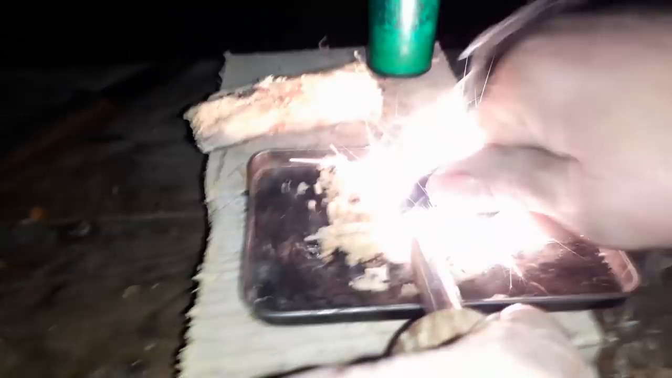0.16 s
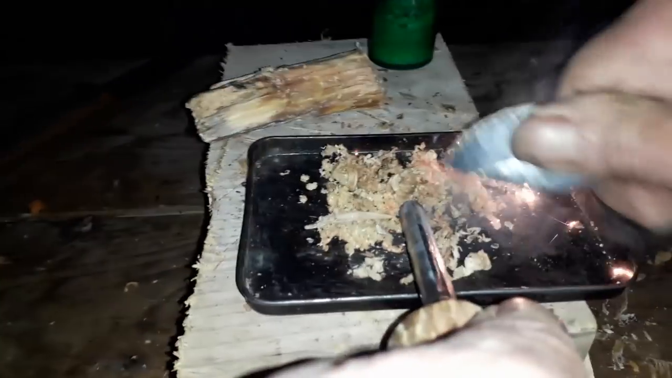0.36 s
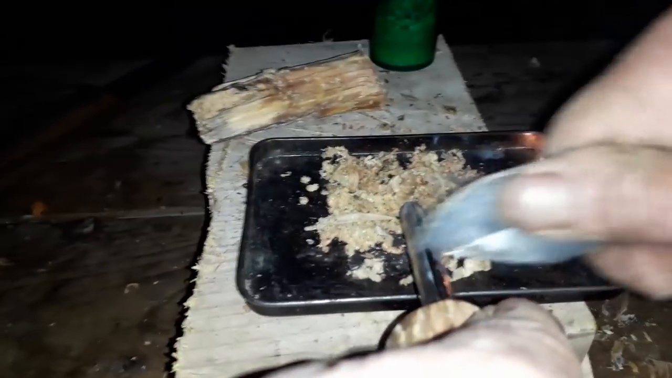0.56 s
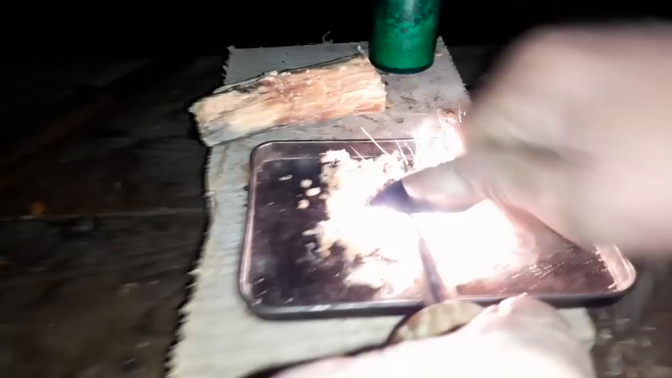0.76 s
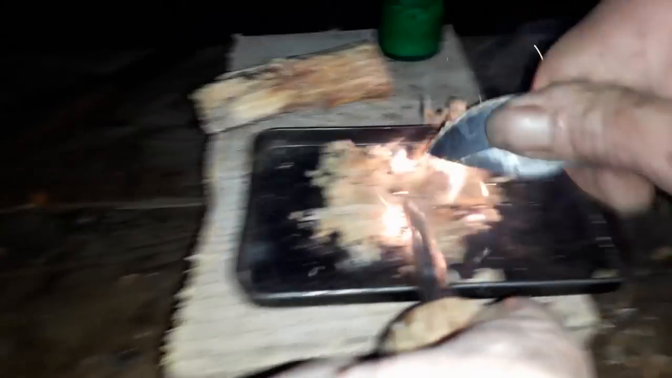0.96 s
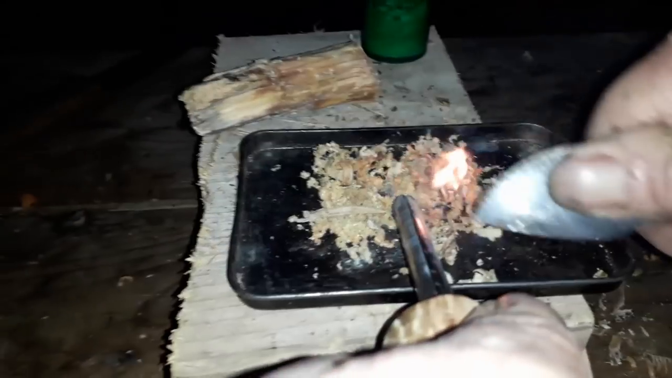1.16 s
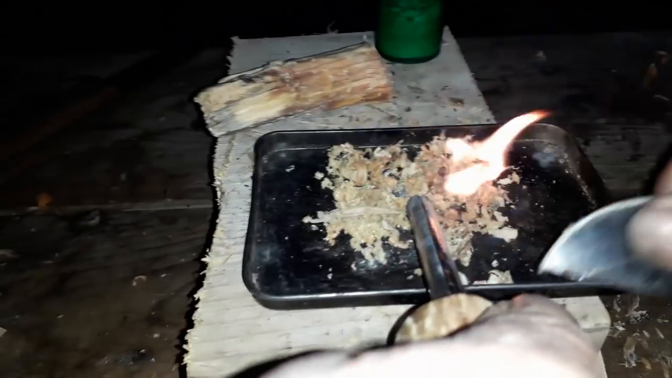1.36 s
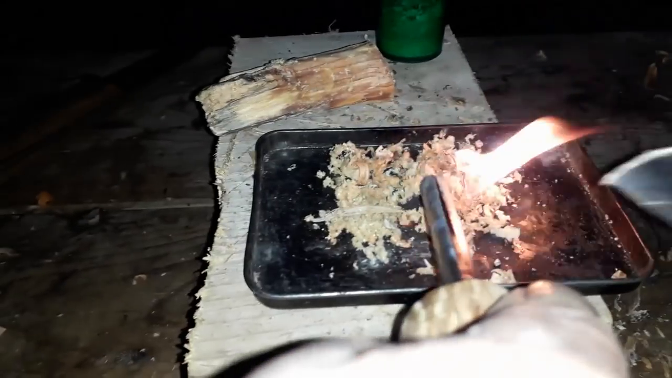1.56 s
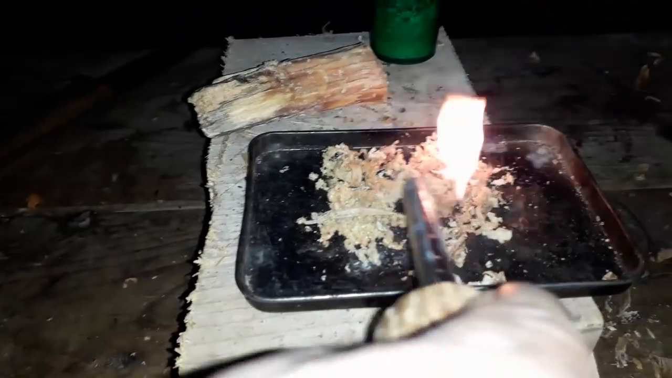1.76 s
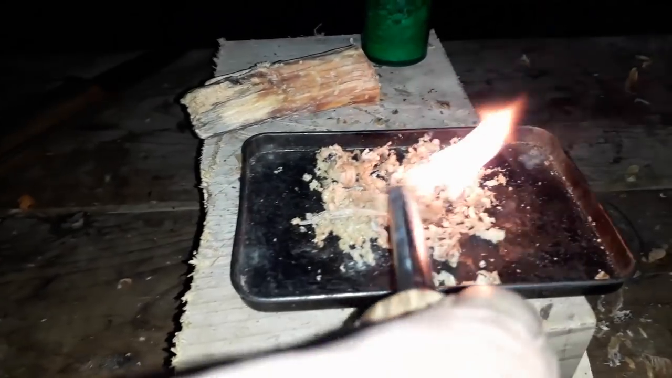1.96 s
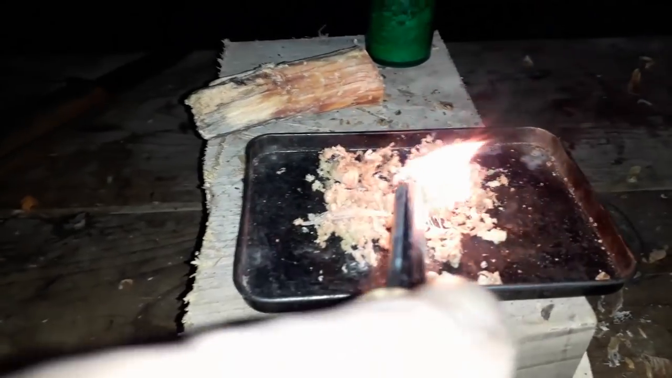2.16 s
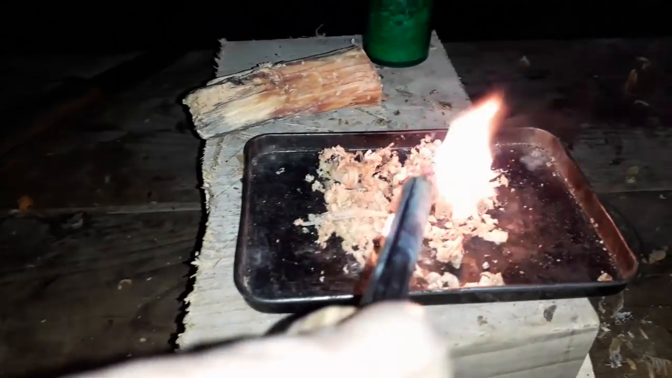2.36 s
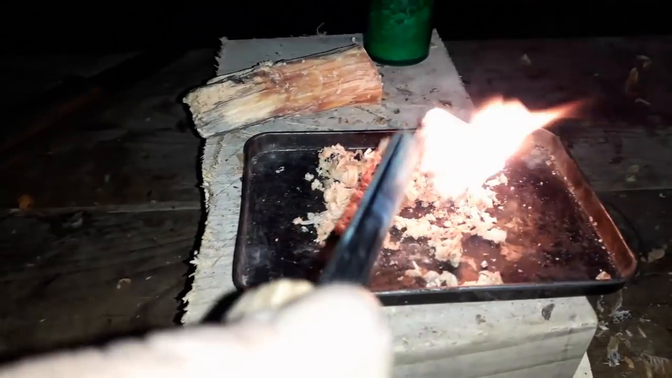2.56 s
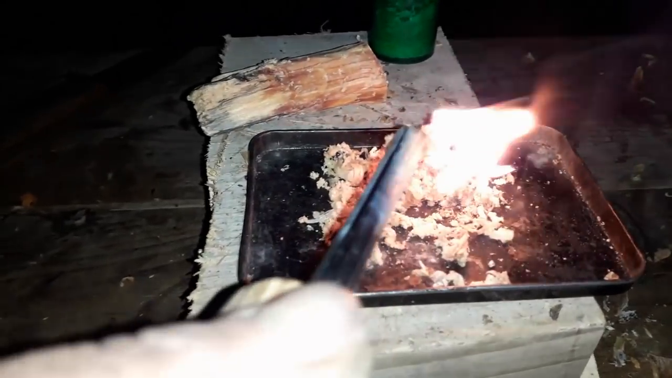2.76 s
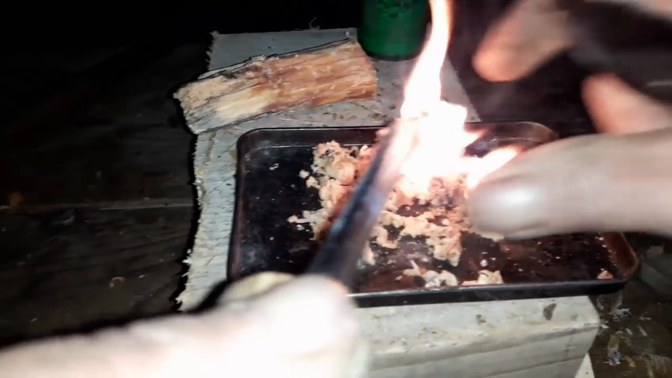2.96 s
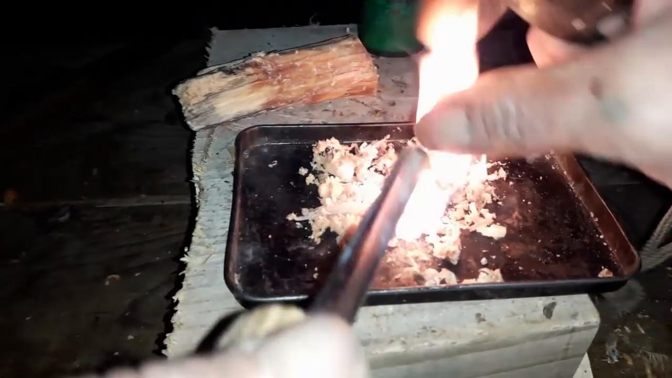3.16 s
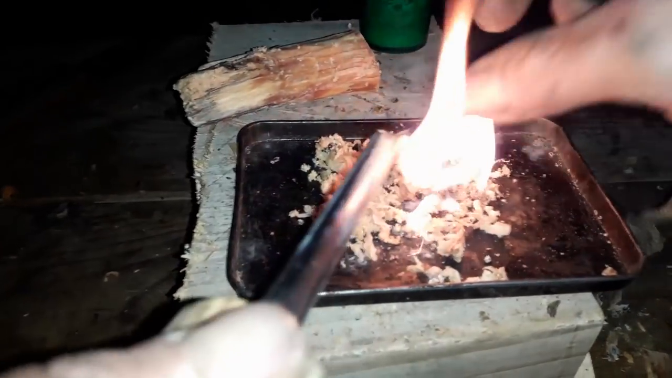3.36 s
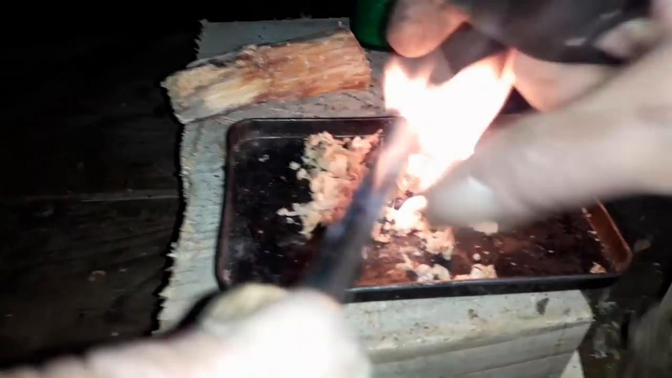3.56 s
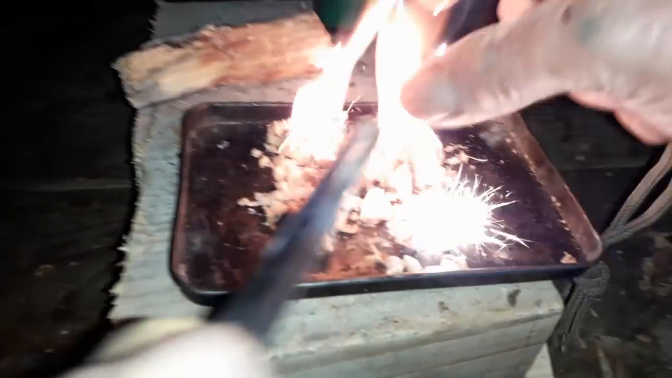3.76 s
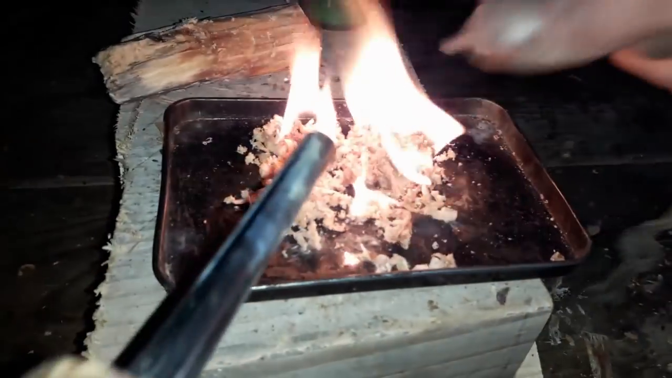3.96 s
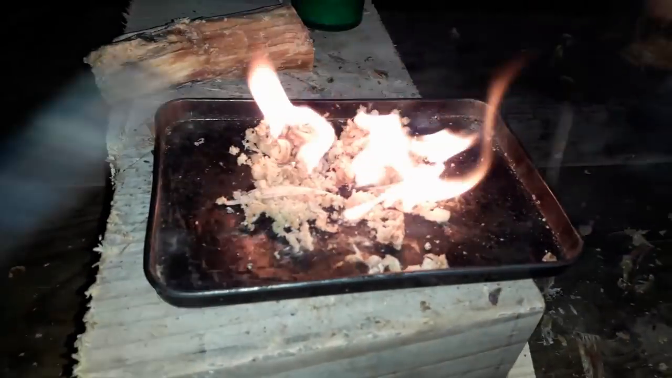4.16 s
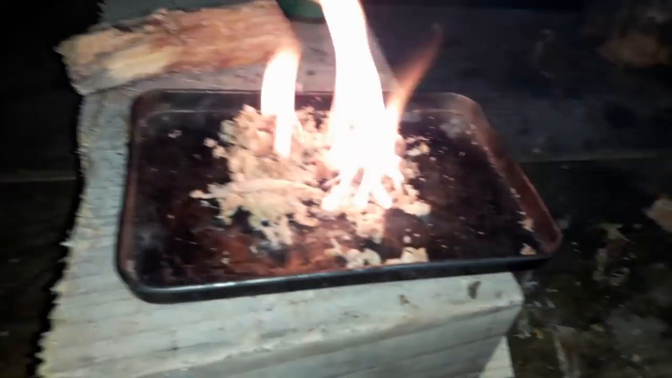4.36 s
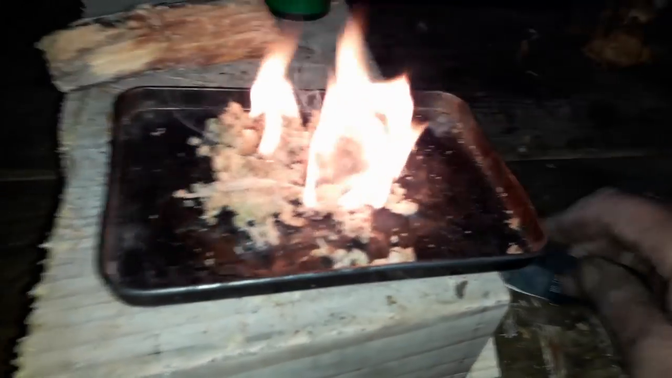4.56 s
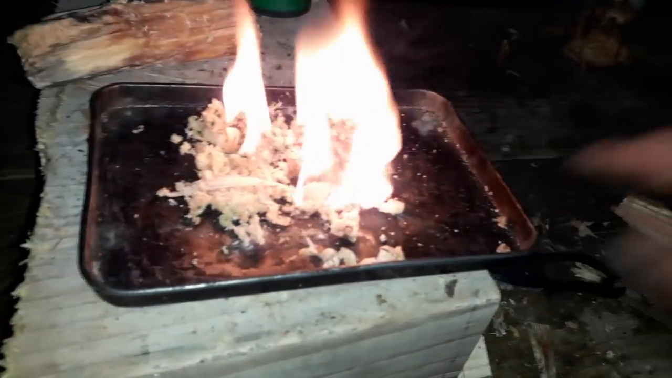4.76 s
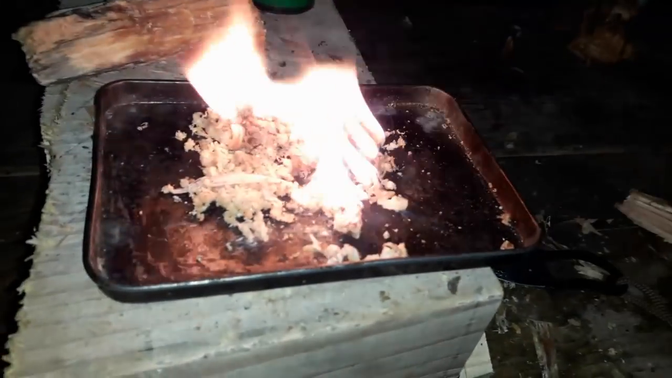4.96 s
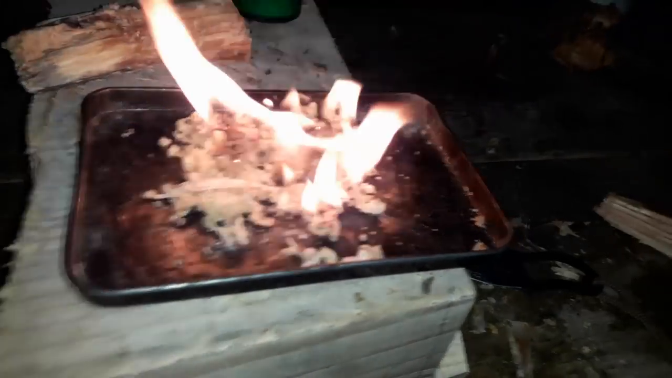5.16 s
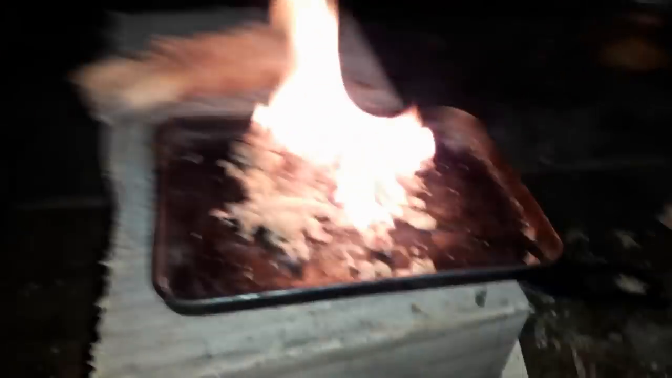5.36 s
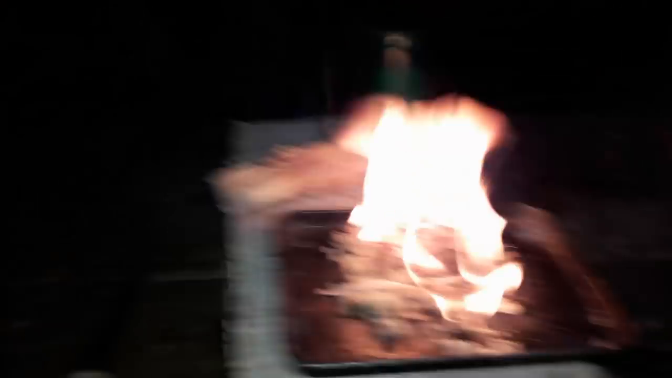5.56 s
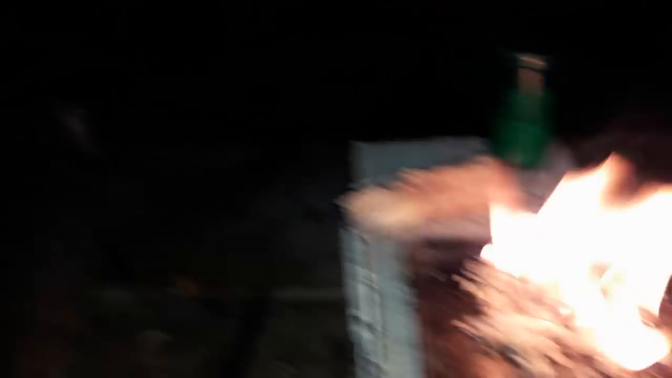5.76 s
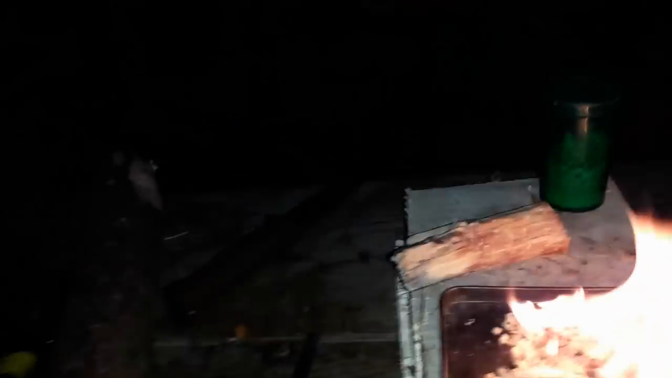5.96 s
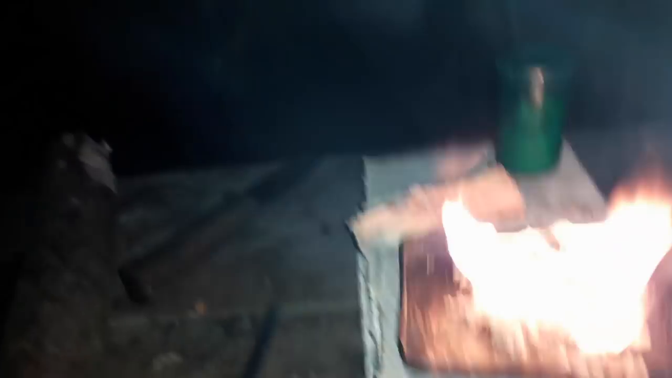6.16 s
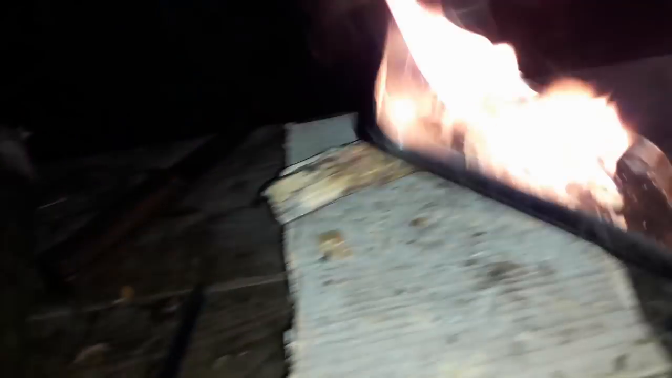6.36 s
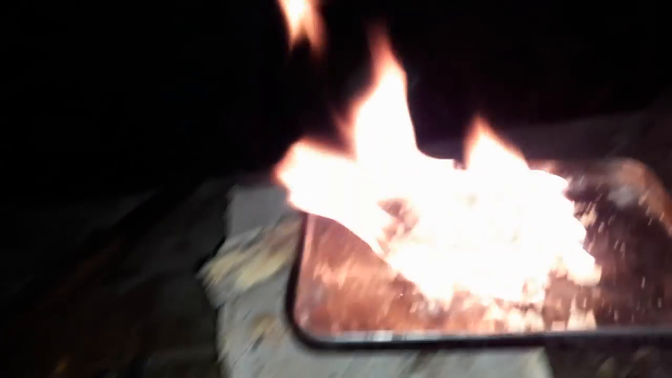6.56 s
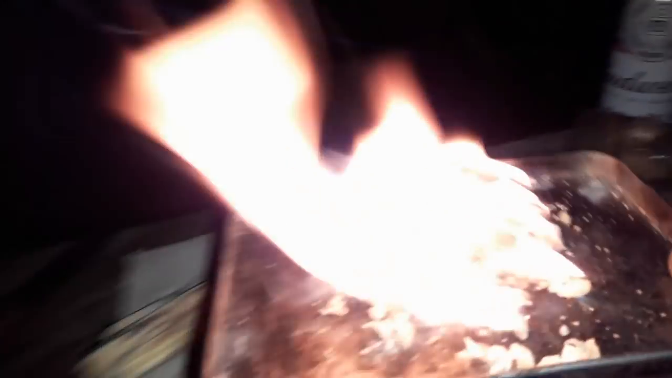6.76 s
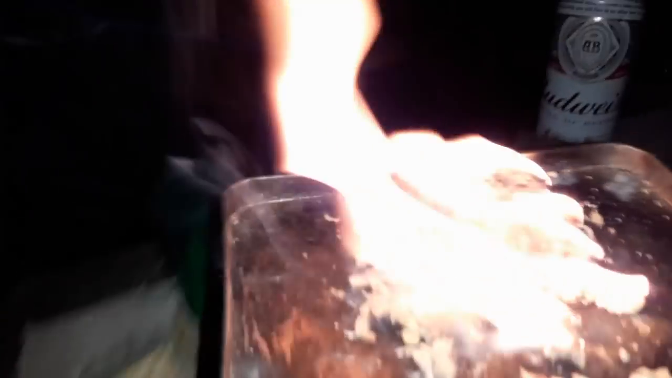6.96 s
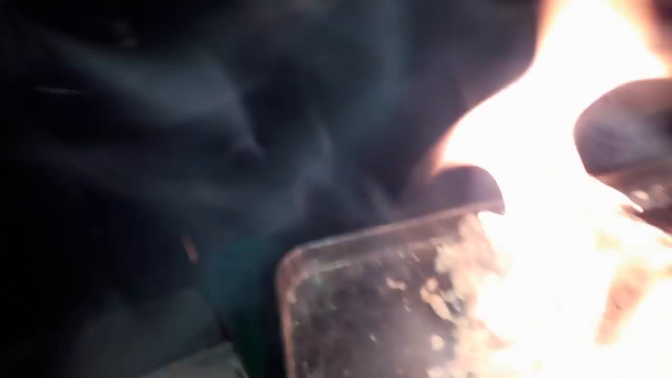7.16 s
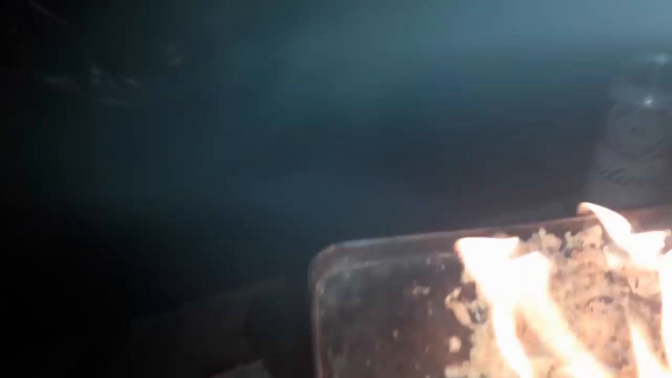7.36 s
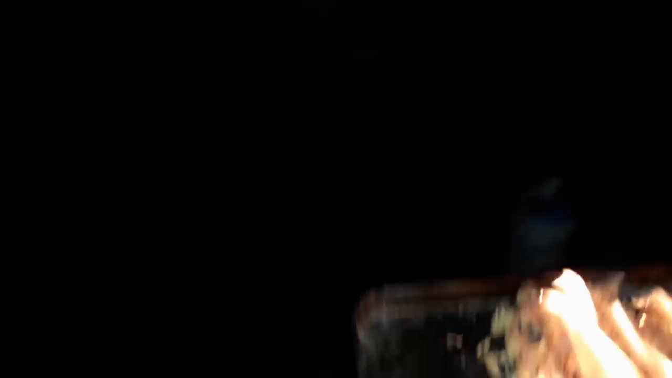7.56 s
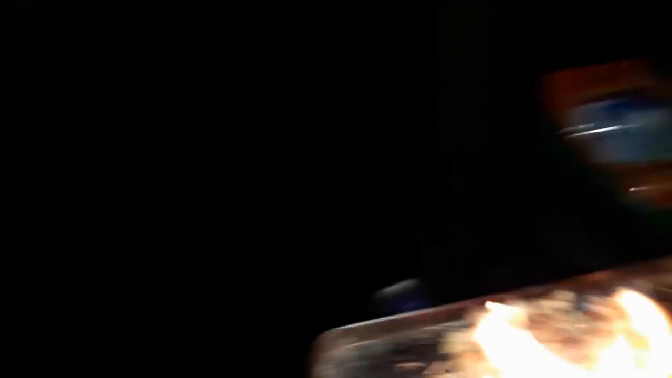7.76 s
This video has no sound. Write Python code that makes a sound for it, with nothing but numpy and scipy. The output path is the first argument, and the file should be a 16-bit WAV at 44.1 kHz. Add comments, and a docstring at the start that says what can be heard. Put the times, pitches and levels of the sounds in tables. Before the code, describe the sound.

A close microphone at night picks up soft low rumble, distant airy wash and faint high hiss. At 0.07-0.25 s a knife spine rasps hard along a metal rod, gritty and ringing, with a dull knock and low puff. A piercing slap at 0.65 leads into a second ringing scrape, sharpest around 0.83, with light trailing scratches until 1.0. Near quiet follows, with tiny sizzles; a snap comes at 2.3, then a crisp snap and faint falling whistle at 3.1. Bright clicks and a dry, non-ringing flick cluster at 3.4-4.0, followed by soft flame puffs. At 4.77 the knife handle clunks onto boards, its blade briefly ringing before damping. From 5.2 to 7.1 fine pops, sizzles and rustles play over stronger hiss. Loud snaps strike at 7.3 and 7.5, with a very faint high whistle, a low puff and a last knock at 7.77.

```python
"""Sparks from a ferro rod at night

A knife spine scrapes a rod, twice with a ringing rod and later once as a bright flick without ring.
Strokes are trains of random fractures shaped by pressure; blows are decaying bursts through a resonance.
Shavings sizzle, and they, rustles and puffs are swells of coloured grains; the put-down knife is damped modes.
Thin whistles are gliding tones; the night and a high hiss, rising and falling and louder later on, are
filtered noise, and reflections follow close sounds."""
import sys
import numpy as np
from scipy import signal
from scipy.fft import rfft
from scipy.io import wavfile
from scipy.ndimage import uniform_filter1d

SR = 44100
rng = np.random.default_rng(int(sys.argv[2]) if len(sys.argv) > 2 else 0)


def unload_wav(signal):
    """Save mono or channel-first audio to the path in sys.argv[1] as 16-bit WAV at rate SR, clipped to [-1, 1]."""
    wavfile.write(
        sys.argv[1],
        SR,
        np.round(np.clip(np.atleast_2d(signal).T, -1, 1) * 32767).astype(np.int16),
    )


N = 344851
T = np.arange(N) / SR
HZ = np.fft.rfftfreq(2048, 1 / SR)


def amp(db):
    """Decibel law: an amplitude ratio is ten to the power dB / 20."""
    return 10 ** (np.asarray(db) / 20)


def evened(x):
    """Power normalisation: scales a signal to rms 1."""
    return x / np.sqrt(np.mean(x ** 2) + 1e-20)


def read(points, hz=HZ):
    """Spectral interpolation: reads levels in dB along a logarithmic frequency axis."""
    f, db = np.transpose(points)
    return np.interp(np.log(hz + 1), np.log(f + 1), db)


def add(mix, s, sound):
    """Superposition: adds a sound to the mix from time s onward."""
    part = mix[max(round(s * SR), 0):][:len(sound)]
    part += sound[:len(part)]


def colour(x, db):
    """Minimum-phase filtering: the Hilbert transform of the log gain at HZ supplies a causal phase."""
    log_gain = np.log(amp(np.maximum(db, db.max() - 90)))
    circle = np.concatenate([log_gain, log_gain[-2:0:-1]])
    response = np.exp(np.conj(signal.hilbert(circle)))
    taps = np.fft.ifft(response).real
    return signal.oaconvolve(x, taps)[:len(x)]


def band_rms(x, lo_hz, hi_hz):
    """Parseval's theorem: the rms of one band follows from its spectral lines."""
    hz = np.fft.rfftfreq(len(x), 1 / SR)
    lines = np.fft.rfft(x)[(hz > lo_hz) & (hz < hi_hz)]
    return np.sqrt(2 * np.sum(abs(lines) ** 2)) / len(x)


def grains(size, per_s, spread_db):
    """Shot noise: sparse impulses of random sign, a few much larger than the rest."""
    sizes_db = spread_db * np.minimum(rng.exponential(1, size), 4)
    impulses = amp(sizes_db) * rng.choice([-1, 1], size)
    return impulses * (rng.random(size) < per_s / SR)


def drift(size, span):
    """Low-pass fluctuation: noise averaged twice over span seconds, at rms 1."""
    width = max(int(span * SR), 2)
    smooth = uniform_filter1d(rng.standard_normal(size), width)
    return evened(uniform_filter1d(smooth, width))


RISE_SHARE = .36  # part of each length spent swelling


def swell(length):
    """Transient envelope: a skewed bell peaking at 1, returned after the time to its peak."""
    rise, fall = length * RISE_SHARE, length * (1 - RISE_SHARE)
    t = np.arange(-3 * rise, 3 * fall, 1 / SR)
    away = abs(t / np.where(t < 0, rise, fall))
    return 3 * rise, np.exp(-2 * away ** 1.5)


def swells(rows, spectrum, per_s, spread_db):
    """Granular excitation: short spells of random impulses share one spectrum."""
    out = np.zeros(N)
    for s, db, length in rows:
        lead, shape = swell(length)
        sound = shape * colour(grains(len(shape), per_s, spread_db), read(spectrum))
        sound *= amp(db) * np.linalg.norm(shape) / np.linalg.norm(sound)
        before_start = max(round((lead - s) * SR), 0)  # samples that would precede t = 0
        add(out, s - lead, sound[before_start:])
    return out


def blows(rows, skirt_db, contact):
    """Impact excitation: one hard contact and a fast-dying rattle drive a broad resonance."""
    out, t = np.zeros(N), np.arange(SR // 6) / SR
    for s, db, decay, hz, octaves in rows:
        push = rng.choice([-1, 1], len(t)) * np.exp(-t / decay)
        push[0] = contact * np.linalg.norm(push)
        away = np.log2((HZ + 20) / hz) / octaves
        burst = colour(push, -skirt_db * np.log2(1 + away ** 2 / 2))
        add(out, s, amp(db) * burst * np.sqrt(decay * SR / 2) / np.linalg.norm(burst))
    return out


def strikes(hits, body):
    """Modal excitation: every hit sounds all the resonances of the body."""
    return [(s, db + share_db, decay, hz, octaves)
            for s, db in hits for share_db, decay, hz, octaves in body]


def patchy(x, depth_db, order=9):
    """Spectral modulation: narrow bands of a sound come and go independently."""
    z = signal.stft(x, nperseg=512)[2]
    across_bands = uniform_filter1d(rng.standard_normal(z.shape), order // 2, 0)
    patches = evened(uniform_filter1d(across_bands, order, 1))
    return signal.istft(z * amp(depth_db * patches))[1][:len(x)]


def surroundings(x, near_db, near_t60, far_db=-33, far_t60=0.42):
    """Reverberation: quick reflections from tray and boards, then a fainter, longer decay (t60 in s)."""
    t = np.arange(SR // 2) / SR
    near, far = (rng.standard_normal(len(t)) * (t > .0015) * amp(-60 * t / t60)
                 for t60 in (near_t60, far_t60))
    echoes = amp(near_db) * near / np.linalg.norm(near) + amp(far_db) * far / np.linalg.norm(far)
    return x + signal.oaconvolve(x, echoes)[:N]


# spectrum of the night: f/Hz, level/dB
NIGHT = [(15, -52), (25, -28), (60, -4.5), (86, 0), (140, -3.5), (242, -5), (420, -14), (482, -10),
         (528, -13), (592, -10), (1150, -3.5), (1230, -4), (2880, -22.5), (4450, -36), (6000, -35),
         (7800, -57), (13200, -120)]
# course of the night before trim: t/s, rumble level/dB, wash level/dB
NIGHT_LEVELS = [(0.42, -57, -52.5), (0.75, -55, -49.5), (1.18, -60, -54.5), (1.76, -58.5, -54),
                (2.29, -50.5, -44.5), (3.12, -52, -46.5), (4.29, -48.5, -46.5), (5.28, -51.5, -45),
                (6.85, -50, -45), (7.22, -47, -45.5), (7.82, -50, -46)]
# spectrum of the high hiss: f/Hz, level/dB
HISS = [(1500, -23.5), (3500, -2.5), (5000, -3), (7700, 1), (10000, -3.5), (16000, -8.5)]
# high hiss before trim, rising and falling, louder later on: t/s, level/dB
HISS_LEVELS = [(1.0, -74), (1.44, -78.5), (2.39, -65), (3.68, -67), (3.77, -60.5), (5.23, -63.5),
               (5.44, -55), (5.69, -61.5), (6.37, -57.5), (7.82, -57.5)]


def air(rumble_db=0.55, wash_db=-0.3, hiss_db=-.3, crackle_db=-8, split_hz=400):
    """Filtered noise: low rumble, distant wash, and a high hiss with a little shot noise in it."""
    s, *levels = np.transpose(NIGHT_LEVELS)
    rumble, wash = (amp(np.interp(T, s, level)) for level in levels)
    hiss = amp(np.interp(T, *np.transpose(HISS_LEVELS)))

    low_share = 1 / (1 + ((HZ + 1) / split_hz) ** 4)  # share of power given to the rumble
    low = colour(rng.standard_normal(N), read(NIGHT) + 10 * np.log10(low_share))
    mid = colour(rng.standard_normal(N), read(NIGHT) + 10 * np.log10(1 - low_share + 1e-9))
    fine_crackle = evened(grains(N, per_s=150, spread_db=5.5))
    high = colour(rng.standard_normal(N) + amp(crackle_db) * fine_crackle, read(HISS))

    low = low / band_rms(low, 40, 300)
    mid = mid / band_rms(mid, 600, 2000)
    high = high / band_rms(high, 4000, 8000)
    return amp(rumble_db) * rumble * low + amp(wash_db) * wash * mid + amp(hiss_db) * hiss * high


# things brushed and shifted nearby: peak t/s, level/dB, length t/s
RUSTLES = [(.015, -48, 0.057), (5.915, -38, 0.065), (6.03, -49.5, 0.12), (6.44, -48.5, .12),
           (7.0, -45, .065), (7.15, -49.5, .13)]
# spectrum of a rustle: f/Hz, level/dB
RUSTLE = [(300, -11.5), (1200, -1.5), (3000, 0), (5000, -5.5), (7500, -5.5), (16000, -18)]


def rustles():
    """Friction noise: brushed things give sparse grains whose bands come and go."""
    return patchy(swells(RUSTLES, RUSTLE, per_s=450, spread_db=4.5), depth_db=4)


# low puffs of air and flame: peak t/s, level/dB, length t/s
PUFFS = [(.167, -32.5, .028), (.825, -39, .05), (2.069, -41.5, .05), (4.007, -31.5, 0.037),
         (4.132, -30, .058), (4.511, -41, .025), (4.945, -30.5, .019), (7.653, -33, 0.024)]
# spectrum of a puff: f/Hz, level/dB
PUFF = [(30, -16), (70, 2), (130, 7.5), (210, -2.5), (350, -18.5), (1000, -54), (4000, -87.5)]


def puffs():
    """Turbulence: puffs of air and flame are dense grains of mostly low frequency."""
    return swells(PUFFS, PUFF, per_s=5000, spread_db=2.5)


# sparks and sizzling in the shavings: peak t/s, level/dB, length t/s
SIZZLES = [(.455, -59.5, .03), (1.585, -62.5, .06), (1.82, -57.5, .05), (1.92, -61, .06),
           (2.27, -51.5, .22), (5.255, -47.5, .07), (5.38, -48.5, .15), (5.61, -46, .09),
           (6.25, -42.5, .055), (6.48, -42.5, .12), (6.63, -44, .12)]
# spectrum of the sizzle: f/Hz, level/dB
SIZZLE = [(500, -23), (2000, 2), (4000, 2), (7500, 8.5), (12000, 0), (16000, -5)]


def sizzles():
    """Shot noise: sparks and sizzling shavings are bright grains in short spells."""
    return swells(SIZZLES, SIZZLE, per_s=900, spread_db=4.5)


# gas leaving the hot wood: t/s, length t/s, first f/Hz, last f/Hz, arch f/Hz, level/dB, fade/dB
WHISTLES = [(3.099, .46, 3870, 3150, -100, -57, 12), (7.44, .25, 9100, 8700, 1550, -57, -1)]


def whistles(waver=0.019, flutter_db=5):
    """Jet tones: escaping gas is a sine of unsteady, arching frequency and fluttering level."""
    out = np.zeros(N)
    for s, length, first_hz, last_hz, arch_hz, db, fade_db in WHISTLES:
        u = np.linspace(0, 1, round(length * SR))
        glide = first_hz + (last_hz - first_hz) * u + arch_hz * np.sin(np.pi * u)
        pitch = glide * (1 + waver * drift(len(u), span=0.0011))
        level_db = db - fade_db * u + flutter_db * drift(len(u), span=0.013)
        level = amp(level_db) * signal.windows.tukey(len(u), .1)
        add(out, s, level * np.sin(2 * np.pi * np.cumsum(pitch) / SR))
    return out


# small pops once the pile has caught; level and frequency are the centres of their spread
CRACKLE_FROM_S, CRACKLE_TO_S, CRACKLES_PER_S = 5.2, 7.1, 7.9
CRACKLE_DB, CRACKLE_HZ = -43.5, 4520


def crackles(spread_db=4, spread_octaves=0.42):
    """Random point process: pops jittered about an even grid, each of its own level and frequency."""
    slots = np.arange(CRACKLE_FROM_S, CRACKLE_TO_S, 1 / CRACKLES_PER_S)
    draws = rng.standard_normal((len(slots), 3))
    return [(s + late / CRACKLES_PER_S,
             CRACKLE_DB + spread_db * size,
             CRACKLE_HZ * 2 ** (spread_octaves * pitch))
            for s, (late, size, pitch) in zip(slots, draws)]


# light ticks of sparks and shavings: t/s, level/dB, centre f/Hz
TICKS = [(2.226, -34, 5940), (3.629, -26, 6000), (3.6488, -20, 5500), (3.694, -24.5, 7000),
         (3.7265, -19.5, 6540), (5.254, -34.5, 6000), (5.598, -26.5, 7000), (5.633, -34, 6500),
         (5.862, -32.5, 2400), (5.899, -31, 3500), (5.957, -31.5, 3300), (5.981, -28, 4000),
         (6.367, -32.5, 5000), (6.4485, -28, 3300), (6.478, -27, 7500), (6.69, -34, 3500),
         (6.993, -30, 3000), (7.7738, -30, 2600)]
TICK_S, TICK_OCTAVES = 0.0018, 0.88  # decay and resonance width
# sharp snaps of steel, rod and burning wood: t/s, level/dB, decay t/s, centre f/Hz, width/octaves
SNAPS = [(2.3043, -22, 0.0043, 4000, 2.2), (3.097, -14, 0.00043, 6330, 0.18),
         (3.1706, -22.5, 0.0041, 6500, 1), (3.6363, -16.5, 0.0032, 6000, 1.1),
         (5.913, -31.5, 0.0086, 3800, 0.84), (6.978, -29.5, .005, 2800, 1.4),
         (7.3082, -13.5, 0.0029, 3200, 0.28), (7.3083, -19, 0.0042, 7000, 0.25),
         (7.3163, -15.5, 0.0027, 2270, 1.2), (7.5145, -15.5, 0.0019, 2930, 0.99)]
# the spine slaps onto the rod before the second stroke: t/s, level/dB
SLAPS = [(.6456, -4.5)]
# resonances of the slap: relative level/dB, decay t/s, centre f/Hz, width/octaves
SLAP = [(0, 0.001, 6900, 0.14), (-8, 0.0033, 2050, .17), (-7, 0.0026, 3300, .25), (-25, .005, 500, .9)]


def snaps():
    """Impulsive sources: slap, snaps, ticks and crackles are brief bursts through resonances."""
    ticks = [(s, db, TICK_S, hz, TICK_OCTAVES) for s, db, hz in TICKS + crackles()]
    return blows(strikes(SLAPS, SLAP) + SNAPS + ticks, skirt_db=7.5, contact=.35)


# dull knocks on the boards and tray: t/s, level/dB, decay t/s, centre f/Hz, width/octaves
KNOCKS = [(.163, -20, 0.0086, 618, 0.48), (.817, -26, .012, 520, 0.8), (.827, -22.5, .006, 900, 0.58),
          (2.305, -37, .005, 480, .9), (3.171, -34.5, .004, 700, 0.91), (4.683, -35.5, .01, 745, .5),
          (4.803, -24.5, 0.013, 290, .7), (5.861, -38, .012, 720, 0.27), (5.905, -39.5, 0.029, 660, .3),
          (6.978, -30.5, 0.015, 580, .6), (7.309, -28, .01, 696, 0.77), (7.5145, -17.5, 0.0039, 634, .45),
          (7.7738, -28, .01, 705, 0.19)]
# the knife handle lands on the boards: t/s, level/dB
LANDINGS = [(4.7708, -14)]
# resonances of the landing: relative level/dB, decay t/s, centre f/Hz, width/octaves
HANDLE = [(-5, .011, 223, 0.26), (0, .005, 510, 0.37), (0.5, 0.0056, 1005, .32)]


def knocks():
    """Impact on damped bodies: landing and knocks are contacts with mostly low resonances."""
    return blows(strikes(LANDINGS, HANDLE) + KNOCKS, skirt_db=9, contact=.7)


# free modes of the blade: f/Hz, level/dB, decay by 60 dB t/s
BLADE_MODES = [(3930, -45.5, 1.1), (6107, -22.5, .45), (8732, -53, 1.5), (10160, -34, .2), (10780, -49, 1),
               (12470, -36, 0.12)]
# light touches that set the blade singing: t/s, level relative to a full blow/dB
TOUCHES = [(2.305, -32), (4.27, -36), (4.45, -35)]


def knife(lands=4.7725, settles=4.819, damped_t60=0.053):
    """Modal decay: the blade rings as the handle lands, then is damped once it lies flat (times in s)."""
    out, t = np.zeros(N), np.arange(SR // 2) / SR
    ring = sum(amp(db - 60 * t / t60) * np.sin(2 * np.pi * hz * t) for hz, db, t60 in BLADE_MODES)
    flat_t = np.maximum(t - (settles - lands), 0)
    add(out, lands, ring * amp(-60 * flat_t / damped_t60))
    for s, db in TOUCHES:
        add(out, s, amp(db) * ring)
    return out


# strokes along the rod: bite t/s, hardest pressure t/s, leave t/s, level/dB, tilt/(dB per octave), rod ring/dB
SCRAPES = [(0.068, 0.073, .105, -12.5, -1, -1.5), (.079, 0.148, .245, -13, 0, 2),
           (0.267, 0.283, .322, -29.5, -0.5, -10), (.68, .697, .77, -33.5, -0.8, -7),
           (.729, 0.803, .875, -19, 0.3, 3), (.825, 0.827, .855, -11, -3, 7),
           (0.855, 0.866, .9, -29, 0, -10), (.902, .917, .952, -29, .8, -2),
           (0.959, 0.972, .995, -44, 0.5, -15), (3.42, 3.426, 3.447, -31.5, 2, -25),
           (3.718, 3.747, 3.84, -30.5, 1, -25), (3.784, 3.8, 3.855, -15, 3, -25),
           (3.966, 3.971, 4.0, -28.5, 1.3, -25)]
# spectrum of the grit: f/Hz, level/dB
GRIT = [(40, -24), (130, -12), (220, 0), (350, -9), (620, -3), (1200, -2.5), (1900, -4), (2800, -1.5),
        (4200, -1.5), (7000, -1), (12000, -4), (16000, -8)]
# modes of the blade pressed on the rod: f/Hz, width f/Hz, level/dB
ROD_MODES = [(2530, 80, 4), (2640, 70, 6), (2760, 80, 10), (3100, 140, 5), (4085, 80, 2), (5080, 90, 2),
             (7600, 250, 1)]
BITE_S, PRESS_DB, EASE_DB = .003, 8.5, 26.5  # half the contact ramp, rise and fall of pressure
BUILD_POWER = 1.9  # above 1 the pressure builds late
RING_GROWTH = 0.59  # further dB of ring lost per dB of lighter pressure


def scrapes(chatter_db=2.0, slip_db=1.0):
    """Stick-slip fracture: uneven slips tear chips off the rod; firm pressure rings blade and rod."""
    out = np.zeros(N)
    modes = sum(amp(db) ** 2 / (1 + (2 * (HZ - hz) / width) ** 2) for hz, width, db in ROD_MODES)
    for start, hardest, end, db, tilt, ring_db in SCRAPES:
        t = np.arange(start - BITE_S, end + BITE_S, 1 / SR)
        contact = np.interp(t, [t[0], start + BITE_S, end - BITE_S, t[-1]], [0, 1, 1, 0])
        built = np.interp(t, [start, hardest], [0, 1]) ** BUILD_POWER
        eased = np.interp(t, [hardest, end], [0, 1])
        force = contact * amp(PRESS_DB * (built - 1) - EASE_DB * eased)

        chips = grains(len(t), per_s=8000, spread_db=2.4)
        unevenness_db = chatter_db * drift(len(t), span=.001) + slip_db * drift(len(t), span=.005)
        chips = chips * amp(unevenness_db)

        grit_db = read(GRIT) + tilt * np.log2((HZ + 200) / 3000)
        grit = colour(chips, grit_db)
        ringing = colour(chips, grit_db + 10 * np.log10(1 + amp(ring_db) ** 2 * modes))
        sound = force * (grit + force ** RING_GROWTH * (ringing - grit))
        add(out, t[0], amp(db) * sound * np.linalg.norm(force) / np.linalg.norm(sound))
    return out


def scene():
    """Superposition: close sounds gain reflections; puffs, blade ring and night air are added directly."""
    night = patchy(air(), depth_db=0.97)
    small = rustles() + sizzles() + whistles()
    body = surroundings(knocks() + scrapes() + small, near_db=-9, near_t60=0.087)
    sharp = surroundings(snaps(), near_db=-10.5, near_t60=.075)
    return (night + puffs() + body + sharp + knife())[None]


# response of the microphone: f/Hz, level/dB
MICROPHONE = [(25, -5), (55, 0), (7750, 0), (8450, -10.5), (9900, -13.5), (11400, -5), (16000, -5.5)]
EDGE_HZ = 15900  # upper band limit


def record(dry):
    """Transducer response: thin bass and dull top, then full-scale clipping and a low-pass band limit."""
    heard = np.clip(colour(dry[0], read(MICROPHONE)), -1, 1)
    low_pass = signal.firwin(511, EDGE_HZ, window=("kaiser", 9), fs=SR)
    return signal.oaconvolve(heard, low_pass, "same")[None]


dry = scene()
out = record(dry)
unload_wav(out)
```